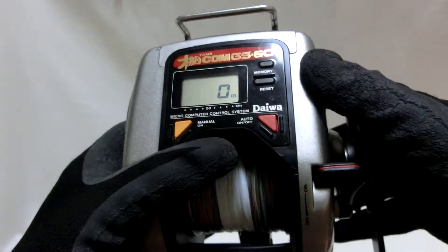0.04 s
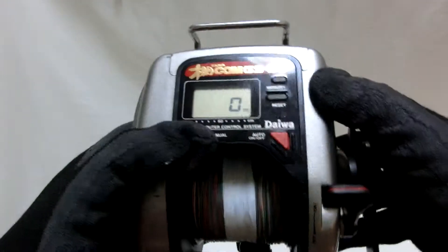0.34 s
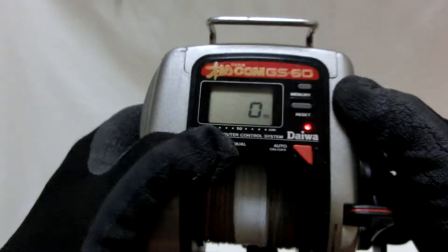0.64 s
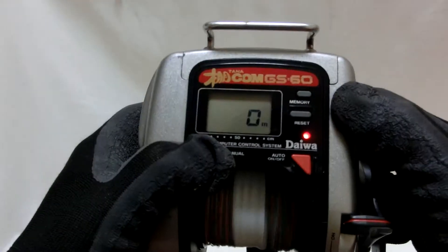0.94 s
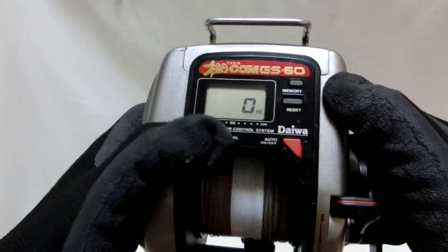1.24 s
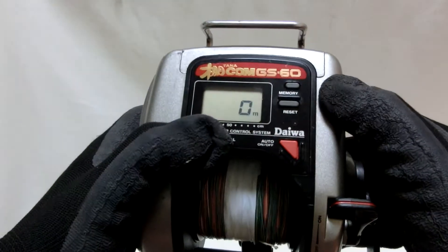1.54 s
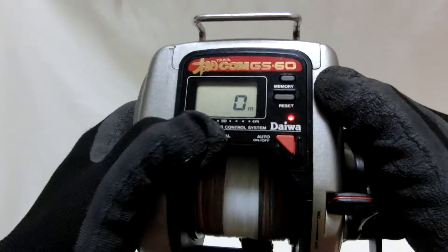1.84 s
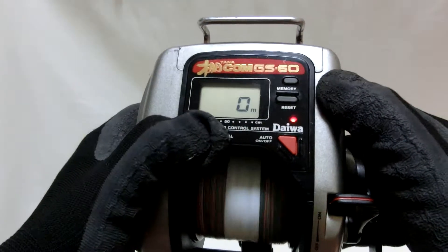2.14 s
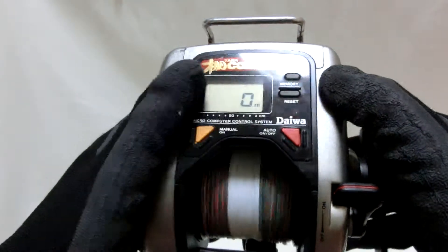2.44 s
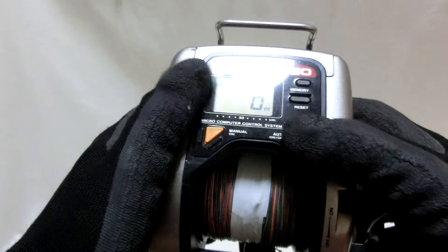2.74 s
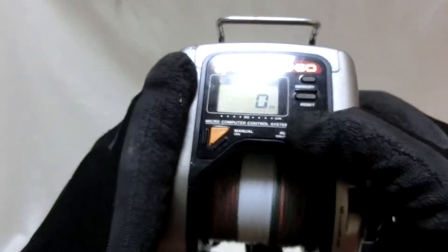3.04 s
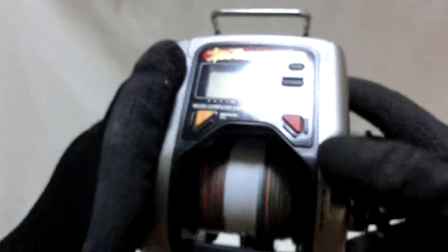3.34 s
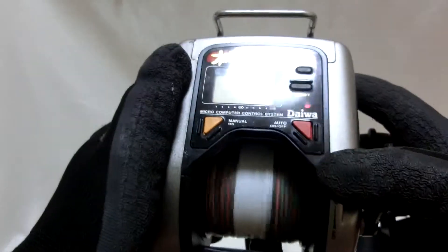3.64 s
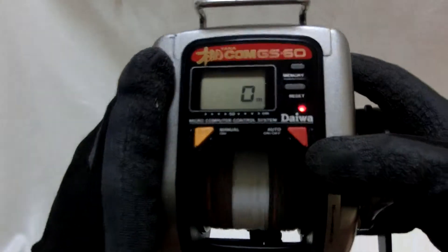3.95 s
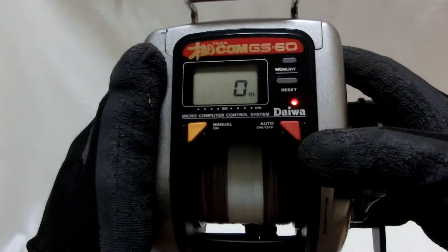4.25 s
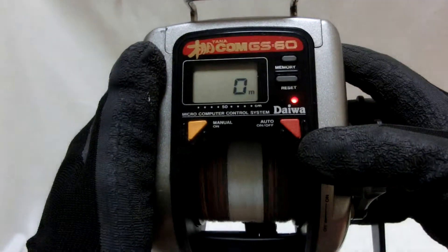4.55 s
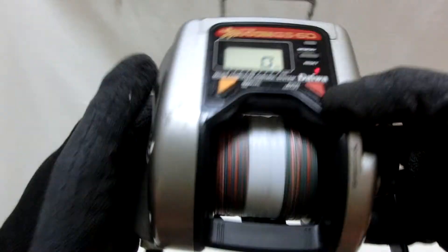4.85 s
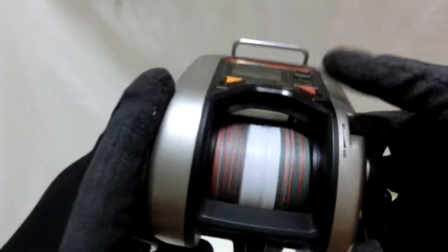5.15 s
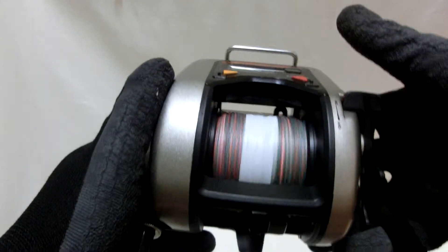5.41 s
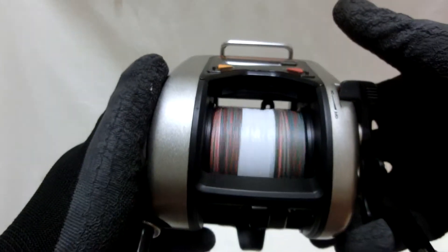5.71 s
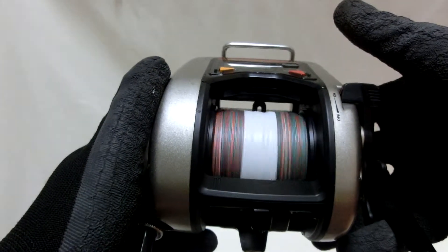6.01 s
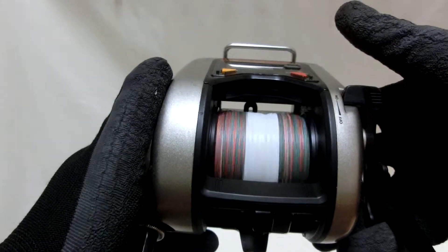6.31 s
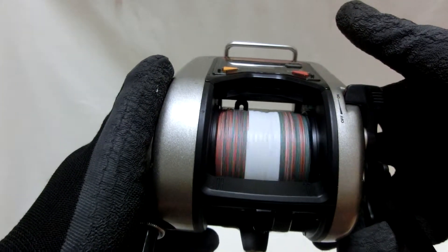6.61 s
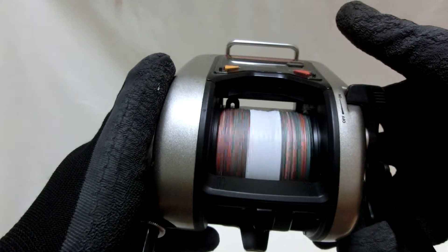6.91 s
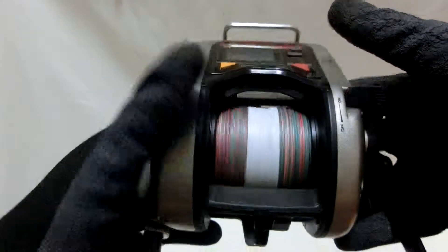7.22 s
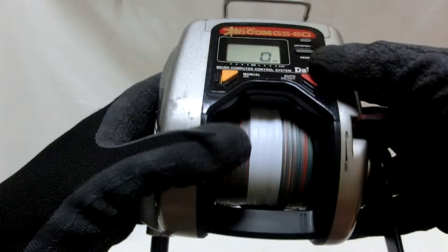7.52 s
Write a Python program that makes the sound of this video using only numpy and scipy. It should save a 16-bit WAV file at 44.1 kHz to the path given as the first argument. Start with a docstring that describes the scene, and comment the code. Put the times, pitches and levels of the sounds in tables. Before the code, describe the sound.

In a quiet room, very near the microphone, an electric fishing reel is switched on and off twice, each brief whir opening with a knock and ending with a click and a quick coast down. Soft glove rubs and small clicks follow. Then the motor stays on, humming under a fine gear rattle and high sizzle, changing colour midway as the reel is tipped, with a few bright ticks.

```python
"""Electric fishing reel, close up

Quiet room, the reel held in gloved hands close to a two-port microphone. It runs twice briefly, then
stays on. Each start slams the slack out of the gear train; the motor hums, its brushes buzz and the
gears rattle in the casing. Midway the open spool side is tipped towards the microphone.
Buttons and loose parts click, and the gloves brush the casing."""
import sys
import numpy as np
from scipy import signal
from scipy.fft import rfft, irfft
from scipy.io import wavfile

SR = 44100
rng = np.random.default_rng(int(sys.argv[2]) if len(sys.argv) > 2 else 0)


def file_out(sig):
    """Save sig as 16-bit WAV at sys.argv[1]."""
    # one column per channel
    cols = np.atleast_2d(sig).T
    # limit, then scale
    lim = np.clip(cols, -1, 1)
    pcm = np.round(lim * 32767).astype(np.int16)
    wavfile.write(sys.argv[1], SR, pcm)


N = 338247
TIME = np.arange(N) / SR
FFT_SIZE = 16384
FREQS = np.maximum(np.arange(FFT_SIZE // 2 + 1) * SR / FFT_SIZE, 1)

# room tone: f/Hz, relative level/dB
ROOM_TONE = [(15, -27), (25, 5.5), (39, -12.5), (66, -4.5), (309, -15), (462, -10), (691, -18.5),
             (856, -17.5), (1280, -24.5), (2430, -25), (4620, -28), (10300, -27), (15000, -30)]
# difference between the microphone ports: f/Hz, side gain/dB
PORT_DIFFERENCE = [(200, -22.5), (1000, -63), (2500, -49), (4500, -13.5), (8000, -7), (14000, -4.5)]
# how the reel faces the microphone: t/s, tip (0 = display side, 0.5 = half turned, 1 = spool side)
REEL_TIP = [(0, 0.016), (4.68, 0.07), (4.8, 0.61), (5.0, 0.87), (5.25, 0.93), (7.05, 0.96), (7.25, 0.85),
            (7.67, 0.64)]
# gloves sliding over the casing: t/s, level/dB, low-pass f/Hz, decay/s
GLOVE_RUBS = [(0, -58.5, 10000, 0.071), (.049, -52.5, 11100, 0.04), (.17, -60.5, 2500, 0.066),
              (1.45, -67.5, 990, 0.81), (1.719, -69.5, 12000, 0.35), (2.54, -48.5, 6000, .05),
              (2.62, -64.5, 1380, .4), (2.73, -62, 6000, 0.2)]
# buttons and loose parts: t/s, level/dB, low-pass f/Hz, chatter length/s
PART_CLICKS = [(0.0398, -35.5, 12700, 0.0039), (.1635, -53, 10900, 0.0044), (.2108, -53.5, 1700, 0.0022),
               (0.2818, -55, 3000, 0.0011), (1.1125, -35.5, 10600, 0.0038), (2.27, -30, 10600, 0.0013),
               (2.516, -52, 8000, .002), (2.5475, -51, 4970, 0.0029), (2.57, -50.5, 10000, 0.003),
               (2.72, -52, 4500, 0.0014), (2.747, -47, 1178, 0.019)]
# slack closing at each start: jolt level/dB, delay to the catch/s, catch level/dB, catch low-pass f/Hz
START_JOLTS = [(-26.5, .0158, -25.5, 10000), (-23.5, .0122, -19, 2050), (-21.5, .016, -21.5, 6300)]
# resonances of the knocked frame: f/Hz, width/Hz, gain/dB
FRAME_MODES = [(281, 89, 9), (550, 110, 4), (736, 200, 5), (1736, 110, 6), (2160, 460, 5), (2780, 170, 1.5),
               (3650, 200, 2)]
# narrow ring in the hiss, shifting as the reel is handled: t/s, f/Hz, level/dB
HISS_RING_PATH = [(3.68, 8100, -75), (3.8, 8150, -50), (4.7, 8350, -50), (5.05, 8650, -50),
                  (5.3, 8900, -68), (7.05, 8000, -68), (7.25, 8450, -52), (7.67, 9000, -48.5)]
# the loudest tooth snaps: t/s, relative level/dB
TOOTH_SNAPS = [(4.8641, -11), (5.1573, -5), (6.325, -5.5), (6.4699, -6.5), (6.6186, -13), (6.9224, -8.5),
               (7.2262, -6), (7.345, -7)]
# motor runs: on t/s, off t/s, rattle level/dB, sizzle level/dB, hum gain/dB
MOTOR_RUNS = [(0.6123, 1.11, -40, -49.5, -3), (1.7988, 2.27, -37, -46.5, -0.1), (2.893, 8, -36.5, -41.5, 0)]
# motor tones: multiple of the shaft rate, display side level/dB, spool side level/dB
MOTOR_TONES = [(1, -50, -50), (2, -65, -64.5), (3, -50.5, -55), (4, -50, -50.5), (5, -59, -56.5),
               (7, -59, -54), (10, -56, -48.5), (11, -85, -48.5), (12, -68, -54.5), (13, -56, -50),
               (14, -59, -58), (15, -62, -59)]
# swell of the third harmonic: t/s, gain/dB
THIRD_TONE_SWELL = [(.6, -1.5), (2.3, -2.5), (3, -5), (3.5, -10), (3.75, 1.5), (4.6, 1), (4.85, -3),
                    (7.67, -4.5)]
# sharp resonances that the tones reach at full speed: f/Hz, width/Hz, gain/dB
HUM_MODES = [(740, 57, 5), (960, 36, 9)]
# broad colour of the gears: f/Hz, display side gain/dB, half turned gain/dB, spool side gain/dB
GEAR_SPECTRUM = [(89, -13.5, -15, -17), (206, -9, -7.5, -13), (417, -12.5, -11, -15.5), (633, -4, -6.5, -5),
                 (1200, -6.5, -2.5, -6.5), (1430, -1, -2.5, -5), (2500.0, -2, 0, -0.5),
                 (4500.0, -1, -6, -6.5), (6630, -0.8, -2, -2.5), (7530, -6.5, -7.5, -12),
                 (9000, -13.5, -12.5, -7), (12550, -15.5, -13.5, -12.5), (14800, -26, -21, -18)]
# casing resonances: f/Hz, width/Hz, display side gain/dB, half turned gain/dB, spool side gain/dB
CASING_MODES = [(284, 125, 5.5, -1.5, 7), (624, 30, 4.5, 3.5, 4.5), (728, 120, 6, 1.7, 2),
                (853, 127.0, 4, -2, 3.0), (1290, 149.0, 3, 0.5, 2.7), (1718, 124, 7.3, 1.5, 3.3),
                (1878, 174.0, 5.5, 7, 7.6), (2065, 106, 5, 7, -1.8), (2380, 66, -1, -0.5, 2.5),
                (3310, 300, 3.5, 2.7, 2), (3700, 200, 6, 8.5, 8.5), (3800, 70, 3, 10, 4),
                (4200, 192.0, -2, -2.5, 9), (4597.0, 390, 1.7, 0.5, 5.5), (4932.0, 80.0, 1, -2.8, 6),
                (5330, 330, 1, 2.5, 4.5), (5720, 440, 0.9, 3, 3), (5980, 56.0, 0.5, 11, 0),
                (6700, 130, 2.5, 7, 5), (6900, 160, 4.5, 3.5, 7), (7530, 290, 4.5, 4.5, 8.5),
                (8380, 270, 5, -4, 1), (8390, 660, -3, 8, 3.5), (8800, 98.0, 3.2, 1.9, -2.0),
                (9689.0, 524.0, 2, 0, 4.5), (10900, 340, 1.5, 2, 4), (11330, 610, -2.5, -0.5, 2.5),
                (12660, 500, -0.5, -1, 6), (12986, 664, -1, 1, 2.5), (13900, 1100, 1, 2, 4.5)]
# strength of the sizzle, duller early in the long run: t/s, gain/dB
SIZZLE_TREND = [(2.7, 2), (2.9, -4), (3.4, -4), (4.25, 0), (4.7, -1), (5.0, 0.9), (6.6, -0.8), (7.67, 1.5)]
# brief swells and dips in the gear noise: t/s, length/s, rattle gain/dB, sizzle gain/dB
GEAR_RASPS = [(1.995, 0.016, -3, 4), (4.344, .12, -0.5, 2), (4.607, 0.018, -3, 5.5), (4.821, .05, 4, 1),
              (4.865, 0.015, 3, 7), (6.32, .025, 0, -3), (7.61, 0.17, 2.5, -0.5)]

SHAFT_HZ, CREEP_HZ_PER_S, CREEP_MIDDLE_S = 239.2, .35, 4   # full speed creeps up as the motor runs in
TEETH_PER_TURN, WHEEL_RATIO, SPOOL_RATIO = 2.48, 12, 36


def from_db(db):
    """Decibels to gain."""
    return 10 ** (np.asarray(db) / 20)


def unit_rms(x):
    """Scale to unit power."""
    return x / np.sqrt(np.mean(x ** 2) + 1e-20)


def noise(size=N):
    """Two white noises: mid, which both ports share, and side, their difference."""
    return rng.standard_normal((2, size))


def drift(rate):
    """Random wander of unit power."""
    knots = rng.standard_normal(1 + N // 8)
    return unit_rms(np.interp(TIME * 2 * rate, np.arange(len(knots)), knots))


def in_time(rows):
    """Each column of a curve at every sample."""
    s, *columns = np.transpose(rows)
    return [np.interp(TIME, s, c) for c in columns]


def response(points, peaks=()):
    """Gain in dB at all frequencies: a smooth slope with resonance humps on top."""
    hz, db = np.transpose(points)
    humps = sum(gain / (1 + (2 * (FREQS - f) / width) ** 2) for f, width, gain in peaks)
    return np.interp(np.log(FREQS), np.log(hz), db) + humps


def colour(x, db):
    """Minimum-phase filter with the given response, on each row of x."""
    cepstrum = irfft(np.log(from_db(db)))
    cepstrum[1:FFT_SIZE // 2] *= 2
    cepstrum[FFT_SIZE // 2 + 1:] = 0
    impulse = irfft(np.exp(rfft(cepstrum)))[None, :FFT_SIZE // 2]
    return signal.oaconvolve(x, impulse, axes=1)[:, :N]


def cut(x, hz, kind, order=2):
    """Butterworth low- or high-pass."""
    return signal.sosfilt(signal.butter(order, min(hz, .45 * SR), kind, fs=SR, output="sos"), x)


def band_gain(db, low_hz, high_hz):
    """Rms that unit white noise has in a band after this response."""
    return np.sqrt(np.mean(from_db(db) ** 2 * (FREQS > low_hz) * (FREQS < high_hz)))


def room_tone(level_db=-61.0):
    """Low rumble and faint hiss of the still room, partly different at the two ports."""
    mid, side = colour(noise(), response(ROOM_TONE))
    return from_db(level_db) * unit_rms(mid + 0.91 * side * np.array([[1], [-1]]))


def echoes(x, t60):
    """Dense reflections that die away, with unit power gain."""
    t = TIME[:SR // 2]
    tail = rng.standard_normal(len(t)) * from_db(-60 * t / t60)
    return signal.fftconvolve(x, tail / np.linalg.norm(tail))[:N]


def glove_rubs(grain_db=1.5):
    """A glove slips on the casing with an uneven swish that dies away."""
    out, t = np.zeros((2, N)), TIME[:SR // 2]
    for s, db, bright_hz, decay_s in GLOVE_RUBS:
        swish = unit_rms(cut(noise(len(t)), bright_hz, "low")) * np.exp(-t / decay_s)
        out[:, round(s * SR):][:, :len(t)] += from_db(db) * swish
    return cut(out * from_db(grain_db * drift(120)), 340, "high")


def start_knocks(switch_db=-37, switch_hz=12000, switch_s=.0038, jolt_hz=2970, catch_s=.0052):
    """Click rows for each start: the switch, the pinion jolting the train, the last wheel catching."""
    rows = []
    for (on_s, *_), (jolt_db, slack_s, catch_db, catch_hz) in zip(MOTOR_RUNS, START_JOLTS):
        rows += [(on_s, switch_db, switch_hz, switch_s),
                 (on_s + switch_s, jolt_db, jolt_hz, slack_s - switch_s),
                 (on_s + slack_s, catch_db, catch_hz, catch_s)]
    return rows


def knocks(crack_s=0.0012, ring_s=0.0018, tail_s=0.1, tail_db=-22):
    """Parts chatter for a few milliseconds as they meet; a faint rattle lingers in the frame."""
    out, t = np.zeros((2, N)), TIME[:SR // 4]
    crack = 0.87 * np.exp(-t / crack_s)   # the first touch is the hardest
    tail = from_db(tail_db) * np.exp(-t / tail_s)
    for s, db, bright_hz, chatter_s in list(PART_CLICKS) + start_knocks():
        chatter = np.exp(-np.maximum(t - chatter_s, 0) / ring_s)
        burst = unit_rms(cut(noise(len(t)), bright_hz, "low"))
        out[:, round(s * SR):][:, :len(t)] += from_db(db) * (crack + chatter + tail) * burst
    slope = [(40, -55), (100, -25), (160, -9.5), (250, -12), (1100, -9.5),
             (3000, -4), (8500, 2), (15000, 5)]   # f/Hz, gain/dB
    return colour(out, response(slope, FRAME_MODES))


def hiss_ring(width_hz=420):
    """A narrow band of gear hiss that slides in pitch."""
    hz, db = in_time(HISS_RING_PATH)
    a, b = cut(noise(), width_hz / 2, "low")
    phase = 2 * np.pi * np.cumsum(hz) / SR
    band = unit_rms(a * np.cos(phase) + b * np.sin(phase))
    return (TIME > HISS_RING_PATH[0][0]) * from_db(db) * band


def tooth_snaps(speed, ring_s=0.0028, gain_db=-12, faint_per_s=2.0, faint_db=-19, spread_db=3):
    """A tooth catches and lets go with a bright tick: loud ones at set times, faint ones at random."""
    envelope, t = np.zeros((2, N)), TIME[:SR // 50]
    sizes_db = faint_db + spread_db * rng.standard_normal(N)
    caught = rng.random(N) < faint_per_s * speed ** 2 / SR
    for s, db in list(TOOTH_SNAPS) + list(zip(TIME[caught], sizes_db[caught])):
        tick = envelope[:, round(s * SR):][:, :len(t)]
        tick += from_db(db + gain_db) * np.exp(-t[:tick.shape[1]] / ring_s)
    return cut(cut(envelope * noise(), 4000, "high"), 9800, "low")


def coasting(off_s, coast_s=.39, curve=1.35):
    """Share of the speed left as friction brakes the shaft after the power is cut."""
    return np.clip(1 - (TIME - off_s) / coast_s, 0, 1) ** curve


def shaft_speed(kick_s=.005, settle_s=.034, settle_share=.38):
    """Share of full speed: a quick kick, a slower settling, and a coast once switched off."""
    speed = 0
    for on_s, off_s, *_ in MOTOR_RUNS:
        t = np.maximum(TIME - on_s, 0)
        rise = 1 - (1 - settle_share) * np.exp(-t / kick_s) - settle_share * np.exp(-t / settle_s)
        speed = speed + rise * coasting(off_s)
    return np.maximum(speed, 0)


def hum_gain():
    """Each run hums with a strength of its own."""
    db = 0
    for on_s, *_, hum_db in MOTOR_RUNS:
        db = np.where(TIME >= on_s, hum_db, db)
    return from_db(db)


def motor_hum(turns, speed, tip, casing_db, flutter_db=1.25, spool_db=.8, casing_share=.35):
    """Harmonics of the shaft rate slide through the casing resonances as the speed changes."""
    slope = [(100, -18), (160, -1), (240, 7), (4000, 16)]   # f/Hz, gain/dB
    radiated_db = casing_share * casing_db + response(slope, HUM_MODES)
    spool_sway_db = spool_db * np.sin(2 * np.pi * turns / SPOOL_RATIO)
    out = 0
    for k, display_db, spool_side_db in MOTOR_TONES:
        facing_db = display_db + tip * (spool_side_db - display_db)
        full_speed_db = np.interp(k * SHAFT_HZ, FREQS, radiated_db)
        resonance_db = np.interp(k * SHAFT_HZ * speed, FREQS, radiated_db) - full_speed_db
        waver_db = flutter_db * min(k / 3, 1.5) * drift(12) + spool_sway_db
        swell_db = in_time(THIRD_TONE_SWELL)[0] if k == 3 else 0
        slowing = speed ** (.1 + .45 * max(k - 3, 0))   # the upper tones die first
        tone = np.sqrt(2) * np.sin(2 * np.pi * (k * turns + rng.random()))
        out = out + slowing * from_db(facing_db + resonance_db + waver_db + swell_db) * tone
    return hum_gain() * out


def casing_sides():
    """The casing's response in dB from three angles: display side, half turned, spool side."""
    slope, modes = np.array(GEAR_SPECTRUM), np.array(CASING_MODES)
    return [response(slope[:, [0, 1 + k]], modes[:, [0, 1, 2 + k]]) for k in range(3)]


def through_casing(rattle, sizzle, tip, sides, rattle_db=-0.81, sizzle_db=0.2):
    """Turning the reel at the microphone fades from one side's resonances to the next."""
    out = 0
    for k, side_db in enumerate(sides):
        facing = np.maximum(1 - np.abs(2 * tip - k), 0)
        low = rattle / band_gain(side_db, 1200, 5000)
        high = sizzle / band_gain(side_db, 8000, 15000)
        out = out + facing * colour(from_db(rattle_db) * low + from_db(sizzle_db) * high, side_db)
    return out


def tooth_strikes(turns, spread_db=7.5, ring_s=0.00057):
    """Each tooth lands with a tiny burst of noise; slack makes timing and strength uneven."""
    teeth = turns * TEETH_PER_TURN + .16 * drift(90)
    landed = np.diff(np.floor(teeth), prepend=0) > 0
    hits = unit_rms(landed * from_db(spread_db * np.clip(rng.standard_normal(N), -2.5, 2.5)))
    envelope = signal.lfilter([1], [1, -np.exp(-1 / (ring_s * SR))], hits)
    return unit_rms(envelope * noise())


def gear_gains(delay_s=0.013, engage_s=0.014, rattle_power=1.4, sizzle_power=2.53):
    """Rattle and sizzle gains: the gears engage abruptly, rasp now and then, and fade as they coast."""
    rattle = sizzle = 0
    for on_s, off_s, rattle_db, sizzle_db, _ in MOTOR_RUNS:
        engaged = np.clip((TIME - on_s - delay_s) / engage_s, 0, 1)
        speed_left = coasting(off_s)
        rattle = rattle + engaged * from_db(rattle_db) * speed_left ** rattle_power
        sizzle = sizzle + engaged * from_db(sizzle_db) * speed_left ** sizzle_power
    for s, length_s, rattle_db, sizzle_db in GEAR_RASPS:
        swell = np.exp(-(2 * (TIME - s) / length_s) ** 2)
        rattle, sizzle = rattle * from_db(rattle_db * swell), sizzle * from_db(sizzle_db * swell)
    return rattle, sizzle * from_db(in_time(SIZZLE_TREND)[0])


def gears(turns, speed, tip, tooth_share=0.28, brush_share=0.75, wheel_db=0.3, uneven_db=1.5):
    """Teeth slide and strike, brushes scrape once a turn: a low rattle and a high sizzle."""
    strikes = tooth_strikes(turns)
    brushes = unit_rms(np.exp(1.3 * np.cos(2 * np.pi * turns)) * noise())
    sliding = noise() * from_db(uneven_db * drift(70))
    body = unit_rms(sliding + tip * brush_share * cut(brushes, 5500, "low") + tooth_share * strikes)
    wobble_db = wheel_db * np.sin(2 * np.pi * turns / WHEEL_RATIO)   # the big wheel runs out of true
    load = from_db(wobble_db + 1.4 * drift(45))
    top = unit_rms((noise() + 0.76 * strikes) * load)
    hard = np.clip(speed, 0, 1)   # slow teeth meet softly
    body = hard * cut(body, 8500, "low", order=6) + (1 - hard) * cut(body, 6100, "low", order=6)
    rattle_gain, sizzle_gain = gear_gains()
    return rattle_gain * body, sizzle_gain * cut(top, 7900, "high", order=6)


def scene(room_db=-16, balance_db=.2):
    """The reel, turned close in front of the two microphone ports, with a little room behind it."""
    speed = shaft_speed() * (1 + .0005 * drift(8))
    full_speed_hz = SHAFT_HZ + CREEP_HZ_PER_S * np.clip(TIME - CREEP_MIDDLE_S, -2, 2)
    turns = np.cumsum(speed * full_speed_hz) / SR
    tip, sides = in_time(REEL_TIP)[0], casing_sides()
    rattle, sizzle = gears(turns, speed, tip)
    reel = through_casing(rattle, sizzle, tip, sides) + knocks() + tooth_snaps(speed) + glove_rubs()
    mid = reel[0] + motor_hum(turns, speed, tip, sides[0])
    # short treble reflections off the gloves and nearby surfaces
    near_echoes = echoes(cut(mid, 4500, "high"), t60=0.088)
    mid = mid + .25 * near_echoes + hiss_ring()
    side = colour(reel[1:], response(PORT_DIFFERENCE))   # treble reaches each port differently
    direct = mid + side * np.array([[1], [-1]])
    room = np.array([echoes(mid, t60=0.075) for _ in range(2)])
    return (direct + from_db(room_db) * room) * from_db([[balance_db], [-balance_db]]) + room_tone()


def record(dry, cutoff_hz=15780):
    """The top is cut steeply."""
    return signal.sosfilt(signal.ellip(12, .1, 90, cutoff_hz, fs=SR, output="sos"), dry)


dry = scene()
out = record(dry)
file_out(out)
```